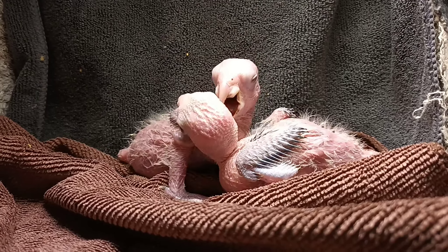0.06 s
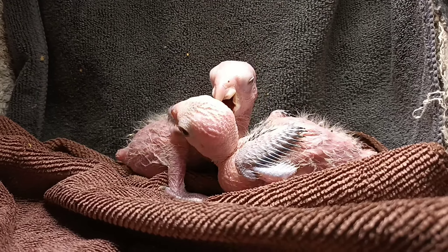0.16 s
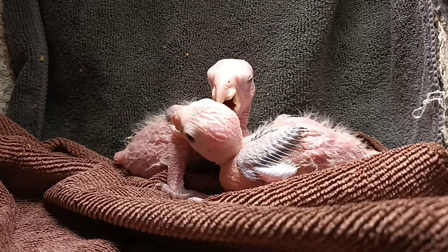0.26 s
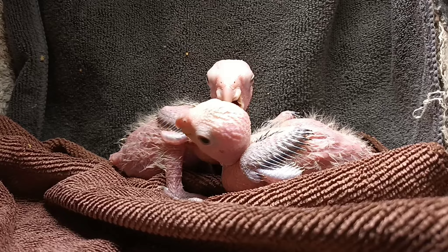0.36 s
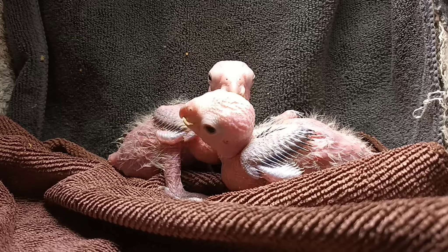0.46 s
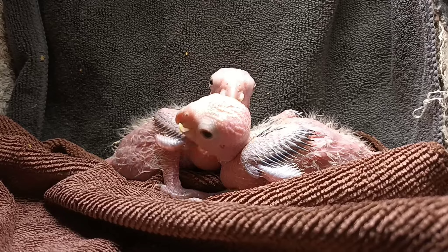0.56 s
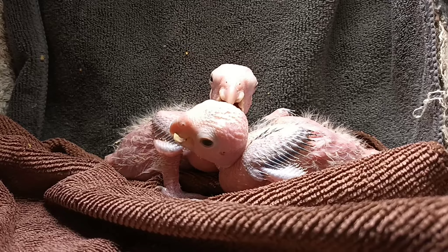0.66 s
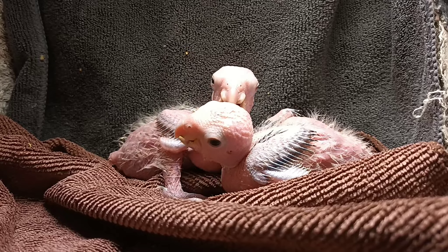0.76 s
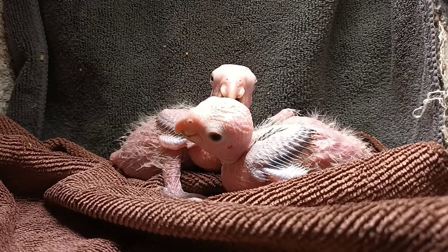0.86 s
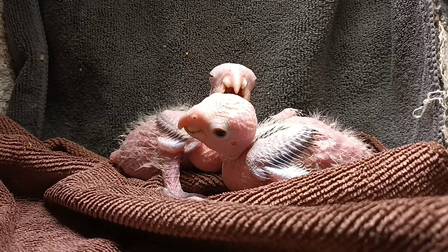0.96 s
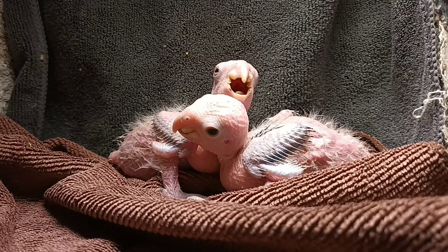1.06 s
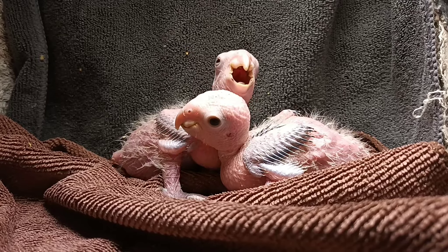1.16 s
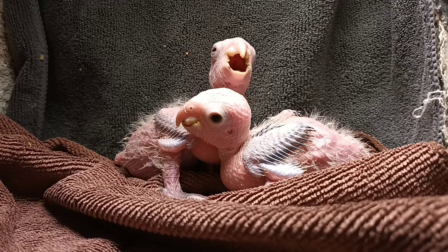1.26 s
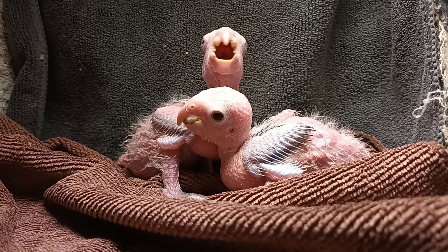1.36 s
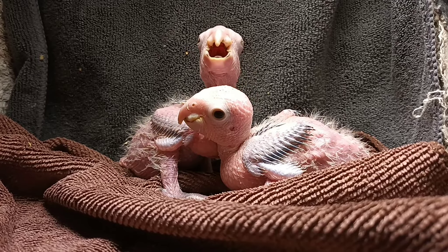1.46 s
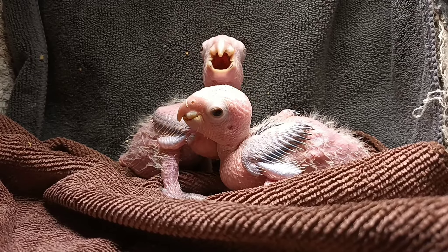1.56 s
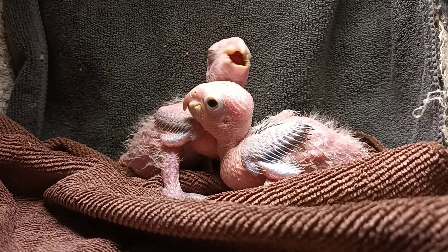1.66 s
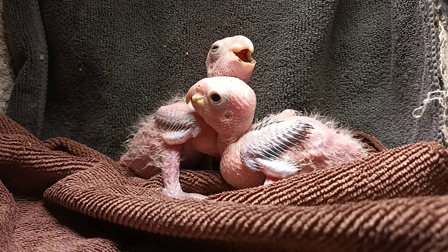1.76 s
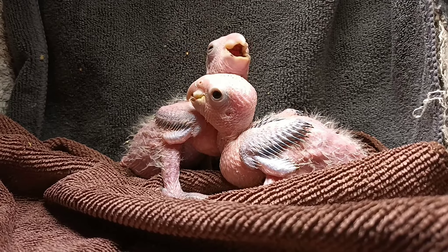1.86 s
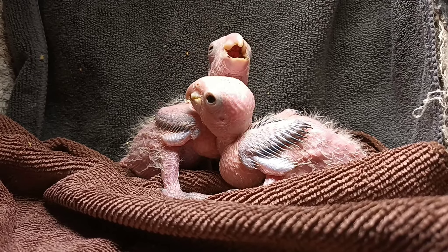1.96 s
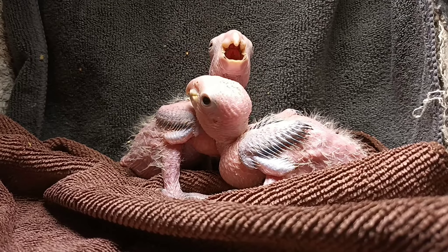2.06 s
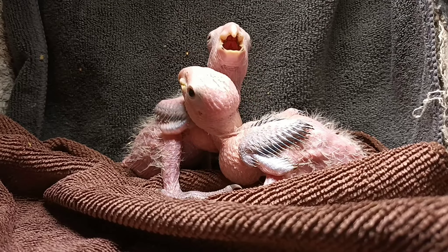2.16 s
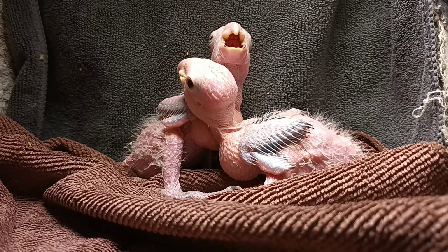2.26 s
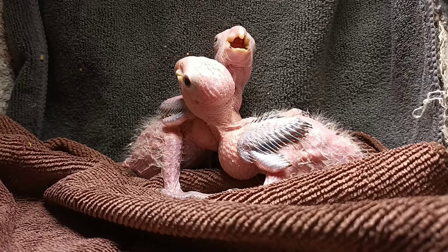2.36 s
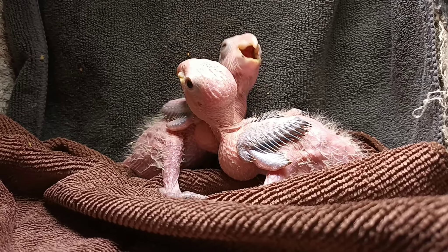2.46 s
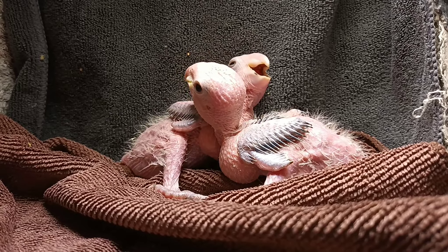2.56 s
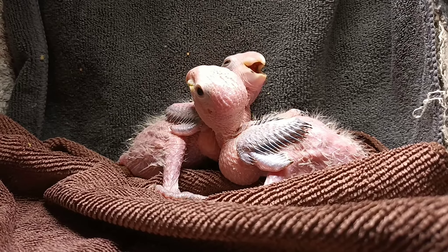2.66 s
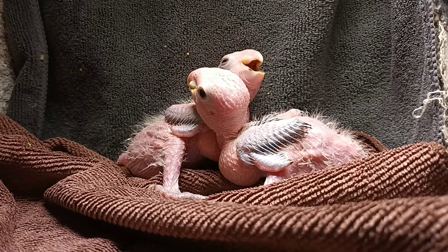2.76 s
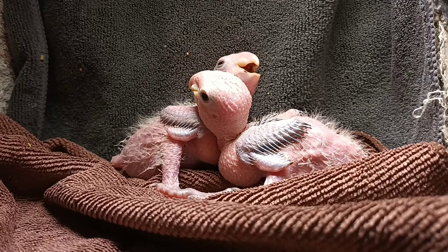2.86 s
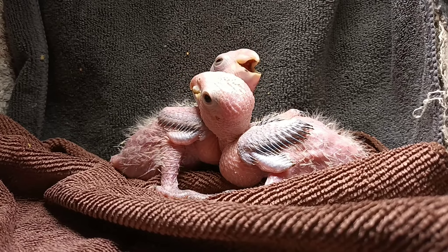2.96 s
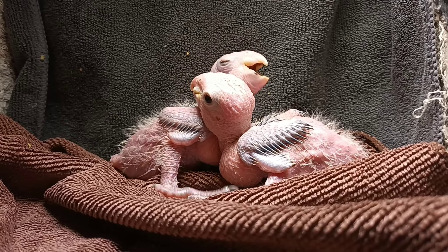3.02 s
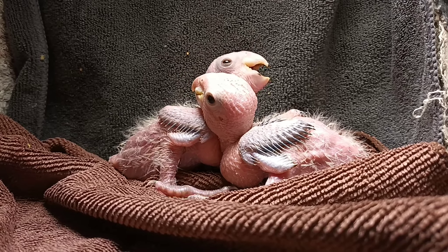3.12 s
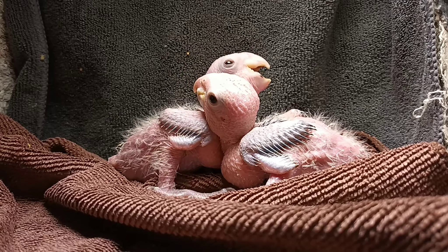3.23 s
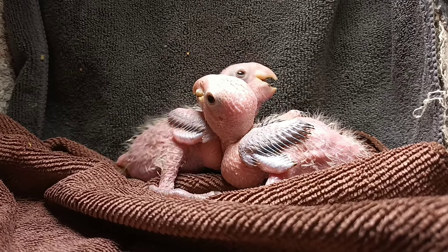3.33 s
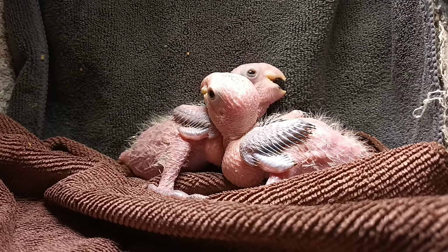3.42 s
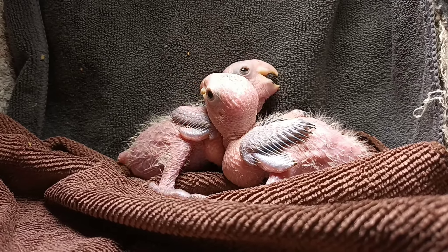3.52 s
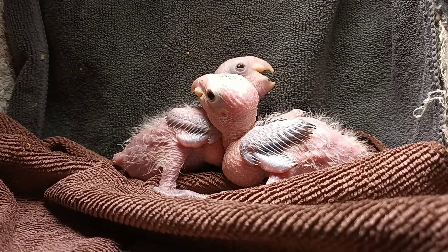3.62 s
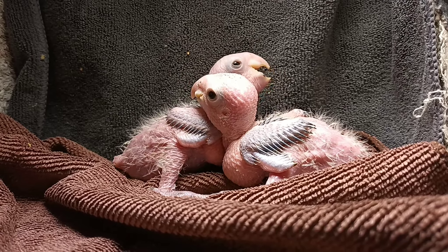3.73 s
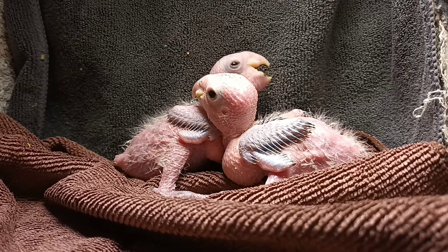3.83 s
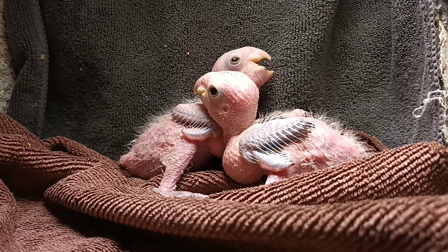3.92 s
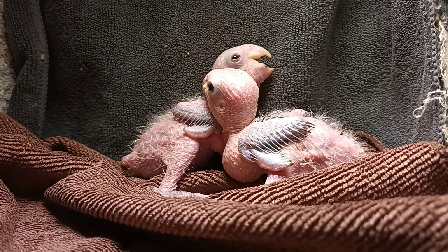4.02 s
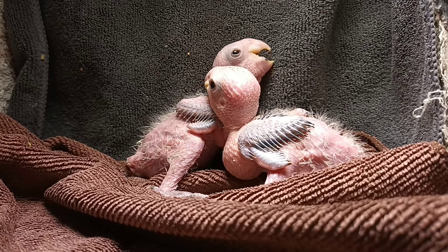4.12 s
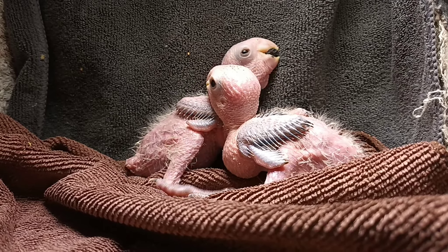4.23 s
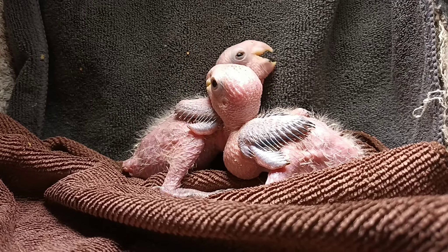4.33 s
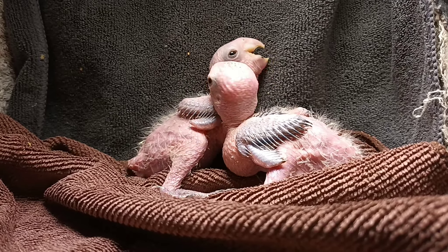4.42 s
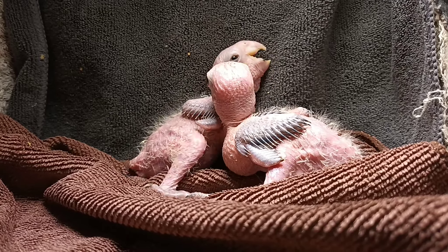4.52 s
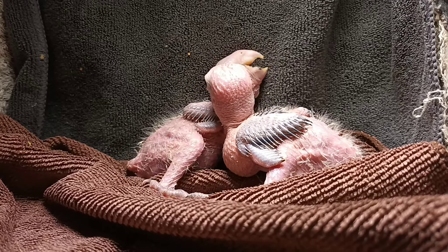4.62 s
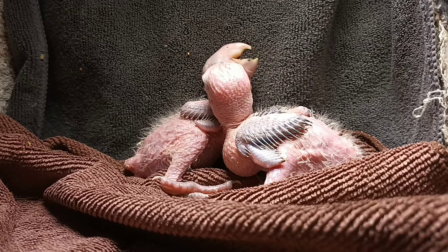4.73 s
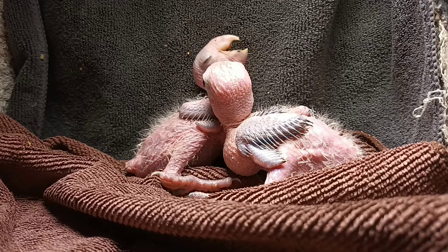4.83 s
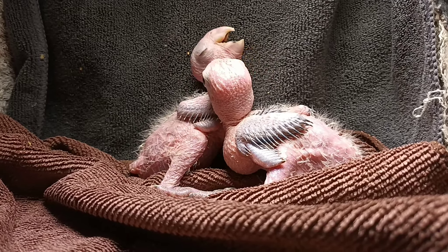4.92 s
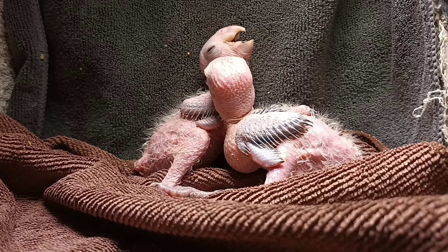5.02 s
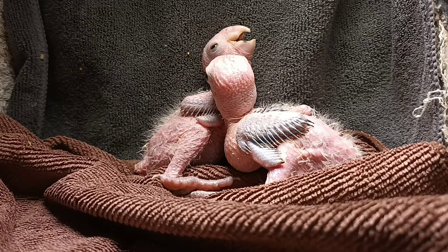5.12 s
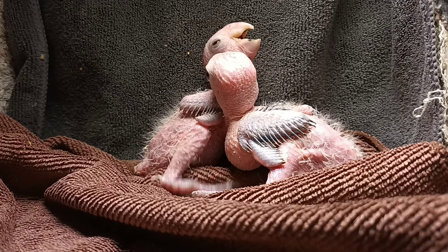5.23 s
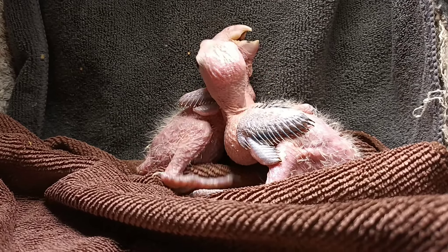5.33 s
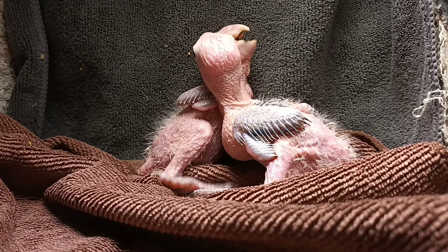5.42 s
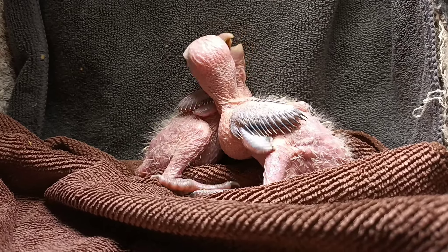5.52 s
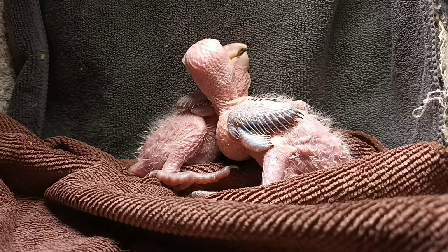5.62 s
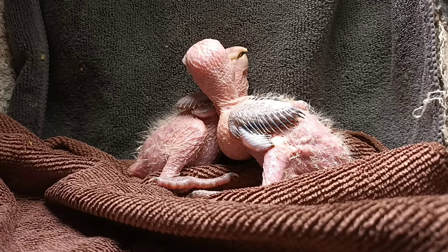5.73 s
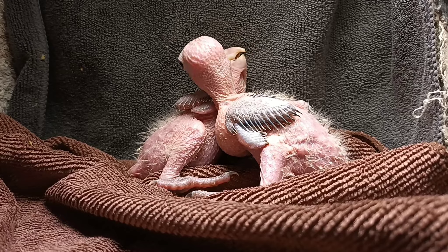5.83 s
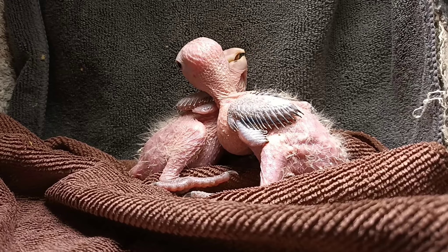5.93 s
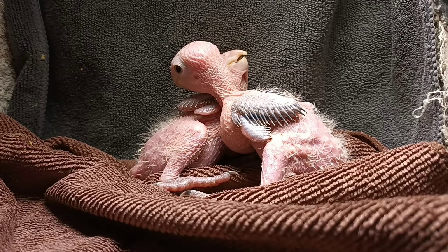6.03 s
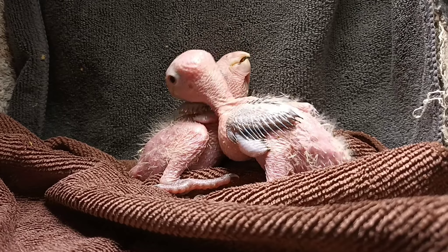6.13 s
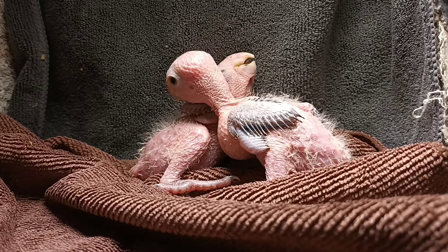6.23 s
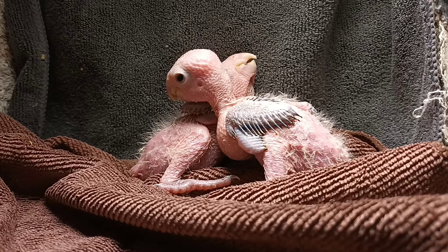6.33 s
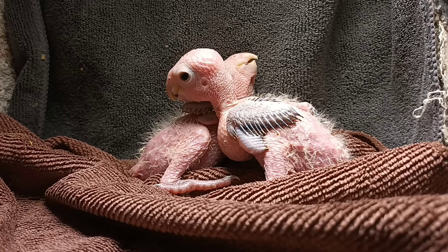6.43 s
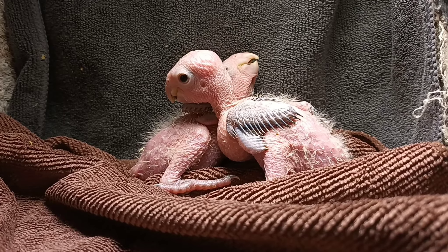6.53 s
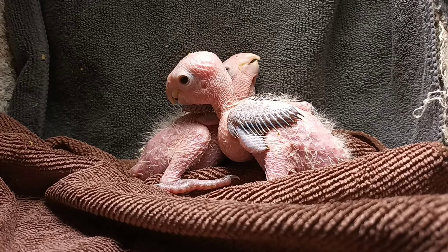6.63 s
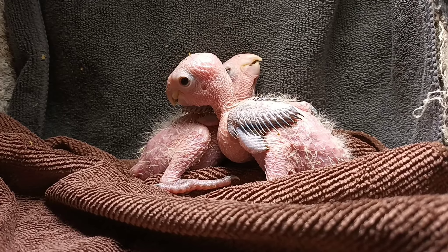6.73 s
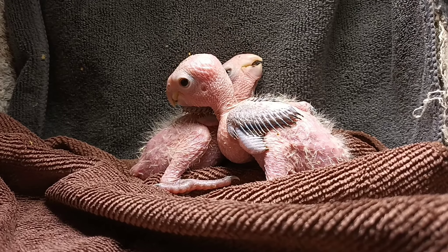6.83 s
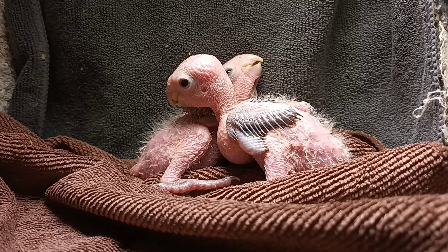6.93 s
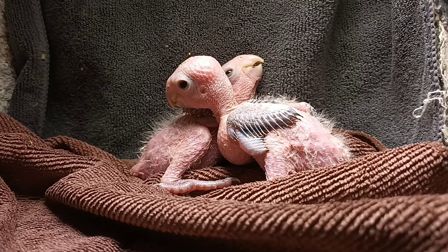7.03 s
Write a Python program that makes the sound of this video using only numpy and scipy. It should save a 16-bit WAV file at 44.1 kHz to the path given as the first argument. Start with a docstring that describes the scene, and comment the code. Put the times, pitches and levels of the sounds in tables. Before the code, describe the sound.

A close stereo microphone picks up a parrot chick begging in a towel-lined nest in a small, fairly dry room. From 0 s it repeats a tight pattern: a tenth-of-a-second nasal squeak, rising then dropping, followed at once by a harsh, fluttering rasp of about a third of a second. Pairs come roughly every 0.45 s. Between 0.3 and 0.6 s a nest mate cries over it, starting hoarse, turning clearer and falling away. The first calls are the brightest and loudest; later ones grow slightly lower and duller. Faint soft bumps occur near 3.2 and 4.1 s. The last rasp ends around 5.45 s, then a final weaker squeak at 5.5 s sinks into a tiny whimper by 5.7 s. Until about 7 s only sparse padded thuds on cloth remain, over low rumble and faint hiss that had been pushed down beneath the calls.

```python
"""Short arched squeaks alternate with long harsh rasps, a little over two pairs a second: a parrot chick
begs from a towel-lined nest. Taut membranes sing the squeaks, slack ones flap out puffs of noise; throat
and beak resonances colour both. A nest mate cries hoarsely once. The last squeak sinks into a whimper.
Padded thuds on the cloth, mostly after the begging, sit over low rumble and faint hiss of shaped noise.
The recorder's fast compressor pushes the background down under loud calls."""
import sys
import numpy as np
from scipy import signal
from scipy.fft import rfft, irfft
from scipy.io import wavfile
from scipy.ndimage import uniform_filter1d, map_coordinates

SR = 44100
rng = np.random.default_rng(int(sys.argv[2]) if len(sys.argv) > 2 else 0)


def materialize(psi):
    """Save the field psi as 16-bit PCM at rate SR to the path in sys.argv[1].

    A 1-D psi becomes a single channel; in a 2-D psi each row is a channel.
    """
    bounded = np.clip(np.atleast_2d(psi).T, -1, 1)
    quanta = np.round(bounded * 32767).astype(np.int16)
    wavfile.write(sys.argv[1], SR, quanta)


N = 312228
TIME_S = np.arange(N) / SR


def undb(db):
    """Decibels to gain."""
    return 10 ** (np.asarray(db) / 20)


def unit(x):
    """Scale to an rms of one."""
    return x / np.sqrt(np.mean(x ** 2))


def curve(rows, x):
    """Table columns, interpolated linearly over the first one at x."""
    knots, *columns = np.transpose(rows)
    return [np.interp(x, knots, column) for column in columns]


def times(start_s, end_s):
    """Sample times of one sound, in seconds."""
    return np.arange(int(start_s * SR), int(end_s * SR)) / SR


def wander(t, rate_hz):
    """Smooth random curve through normal draws, rate_hz knots a second, spread near one."""
    elapsed = t - t[0]
    knots = rng.standard_normal(int(elapsed[-1] * rate_hz) + 2)
    return map_coordinates(knots, [elapsed * rate_hz], order=2, mode="nearest")


def add(out, start_s, x):
    """Mix a stereo sound in at its time."""
    i = max(int(start_s * SR), 0)
    out[:, i:i + x.shape[1]] += x[:, :N - i]


def split(left_minus_right_db):
    """A level difference shared evenly by the two sides, in dB."""
    return np.array([[left_minus_right_db], [-left_minus_right_db]]) / 2


def nest(x, echo_db=-4.0, decay_s=0.0019):
    """Echoes off the nest walls; they change through a call as the head sways."""
    t = times(0, .02)
    echoes = unit(rng.standard_normal((2, 2, len(t))) * t * np.exp(-t / decay_s))
    walls = undb(echo_db) * echoes / np.sqrt(len(t))
    early, late = (signal.fftconvolve(x, wall, axes=1)[:, :x.shape[1]] for wall in walls)
    sway = np.linspace(0, np.pi / 2, x.shape[1])
    return x + early * np.cos(sway) + late * np.sin(sway)


# resonances of throat, beak and nest:
# (centre before tuning [Hz], -6 dB width [Hz], left level [dB], right level [dB])
RESONANCES = [(1425, 400, -18.5, -37), (2572, 620, -5, -15.5), (3770, 1360, -8, -12), (4420, 134, -3, 2.5),
              (4833, 236, 3.5, -56), (5360, 580, -4.5, -6), (6085, 263, 7.5, -3), (6425, 340, 1, -2.5),
              (7130, 680, -14, -30), (10020, 810, -33, -17.5), (11316, 440, -20.5, -4.5),
              (15500, 1130, -9.5, -10)]
# seat of the chick: (time [s], centre of the dip from the nest-floor bounce [Hz],
# left lag scale [0.1 = PORT_LAG as listed], squeak fundamental re throat output [dB])
SEAT = [(0, 3430, 0.1, -13), (.5, 3570, 0.1, -12), (1.4, 3360, 0.092, -16.5), (1.9, 3505, 0.083, -9.5),
        (2.6, 2640, 0.069, -8), (3.6, 2740, 0.059, -9), (4.3, 2920, 0.05, -13.5), (5.5, 3040, 0.043, -11)]
# nest-bent path to the two ports: (frequency [Hz], left phase lag at lag scale 0.1 [rad])
PORT_LAG = [(0, 7.5), (1150, -1.5), (2300, 4.5), (3300, 4), (4000, 4), (4750, 4), (5800, 5.5), (6500, 7.5),
            (8000, 10), (16000, 23)]


def throat(source, start_s, posture, beak_width_hz=500, notch_db=-13, notch_width_hz=85,
           lowest_hz=850, size=32768):
    """Ring a source through throat and beak; nest and port spacing set the two sides apart."""
    beak_hz, beak_db, tuning, tilt_db_per_oct, treble_db, pan_db = posture
    notch_hz, lag_scale, _ = curve(SEAT, start_s)
    f = np.fft.rfftfreq(size, 1 / SR)
    power = 0
    for hz, width_hz, left_db, right_db in RESONANCES:
        shape = 1 / (1 + (2 * (f - hz * tuning) / width_hz) ** 2) ** 2
        power = power + undb([[left_db], [right_db]]) ** 2 * shape
    db = beak_db / (1 + ((f - beak_hz) / beak_width_hz) ** 2)
    db = db + notch_db / (1 + ((f - notch_hz) / notch_width_hz) ** 2)
    db = db + tilt_db_per_oct * np.log2(np.clip(f, 2250, 7300) / 4500)
    db = db + treble_db * np.clip((f - 7000) / 4500, 0, 1.5)
    # so small a beak radiates little bass
    radiation = 1 / (1 + (lowest_hz / (f + 100)) ** 4)
    gain = np.sqrt(power * radiation) * undb(db + split(pan_db))
    # minimum phase: resonances ring after the push, never before
    cepstrum = irfft(np.log(gain).mean(0))
    ring_phase = 2 * rfft(cepstrum[:size // 2], size).imag
    phase = ring_phase - curve(PORT_LAG, f)[0] * np.array([[10 * lag_scale], [0]])
    y = irfft(rfft(source, size) * gain * np.exp(1j * phase))
    return unit(nest(y[:, :len(source) + SR // 50]))


# voice organ: (harmonic number [1], level [dB])
OVERTONES = [(2, 13), (3, -1), (4, 12), (5, 4), (6, 0.5), (7, -6), (10, -0.5), (18, -43.5)]


def overtones(phase, half=0, count=18):
    """Harmonics 2 to count - 1; alternating strong and weak cycles add lines between them."""
    number, db = np.transpose(OVERTONES)
    stack = sum(undb(np.interp(k, number, db)) * np.sin(k * phase) for k in range(2, count))
    return unit(stack) * (1 + half * np.cos(phase / 2))


# (start [s], end [s], throat output level [dB], top pitch [Hz], place of top [0-1],
# share of pitch lost by the end [0-1], then posture: beak resonance [Hz], beak boost [dB],
# throat tuning [factor], tilt [dB/octave], treble [dB], left-minus-right offset [dB])
SQUEAKS = [(0, 0.086, -3, 963, 0.46, 0.22, 3600, 7.5, 1.12, 4, -5, 1),
           (0.45, 0.546, -4, 940, 0.39, 0.22, 4050, -3, 1.02, 8, 10.5, 3),
           (0.909, 1.01, -8, 937, .38, 0.21, 4540, 15.5, 1.06, 2, 0, 1),
           (1.367, 1.476, -0.5, 941, .46, 0.22, 4700, 14.5, 0.985, 3.5, 4.5, 0.5),
           (1.819, 1.92, -13.5, 893, 0.37, .2, 3320, 11, 0.98, 7.5, -9, -1),
           (2.269, 2.376, -15, 888.5, .44, 0.15, 2940, 11, 0.96, 7, 2, 3),
           (2.735, 2.835, -13.5, 915.6, 0.32, 0.2, 3730, 9, 0.98, 5, 5.5, 3),
           (3.186, 3.292, -14, 893, 0.36, 0.19, 3200, 7, 0.94, 6, -6, 3.5),
           (3.637, 3.743, -15, 879.6, .32, .18, 3240, 11, 0.97, 6.5, -3.5, 3.5),
           (4.105, 4.215, -19.5, 875, .46, 0.23, 3100, 4, 0.975, 0, -7, -0.5),
           (4.546, 4.653, -12.5, 862, 0.35, 0.15, 3130, 10, 0.96, 3, -11, 2.5),
           (5.011, 5.118, -14.5, 868, 0.29, 0.15, 3110, 12, 0.95, 5.5, 1.5, 3.5),
           (5.483, 5.584, -20.5, 865, 0.49, 0.23, 3303, 5, 0.97, -1.5, -16, 1)]
# share below top pitch at the start; exponents of rise and fall
SQUEAK_RISE, RISE_POWER, FALL_POWER = .2, 2.2, 1.8
# flicker of pitch and force, as shares
SQUEAK_JITTER, SQUEAK_SHIMMER = .004, .05


def squeak(row, waver=0.0036, air_db=-31, beak_width_hz=380, overtone_power=1.005,
           fundamental_power=0.93, fundamental_pan_db=2.8):
    """Taut membranes sing an arch of pitch and force; the fundamental bypasses the resonances."""
    start_s, end_s, level_db, top_hz, crest, fall, *posture = row
    t = times(start_s, end_s)
    u = np.linspace(0, 1, len(t))
    rise_sag = SQUEAK_RISE * np.abs(1 - u / crest) ** RISE_POWER
    fall_sag = fall * np.abs((u - crest) / (1 - crest)) ** FALL_POWER
    sag = np.where(u < crest, rise_sag, fall_sag)
    flicker = 1 + SQUEAK_JITTER * wander(t, 427) + waver * wander(t, 68.0)
    phase = 2 * np.pi * np.cumsum(top_hz * (1 - sag) * flicker) / SR
    force = np.abs(np.sin(np.pi * u))
    source = overtones(phase) * (1 + SQUEAK_SHIMMER * wander(t, 270))
    source = source + undb(air_db) * rng.standard_normal(len(t))
    y = throat(source * force ** overtone_power, start_s, posture, beak_width_hz)
    fundamental = unit(force ** fundamental_power * np.sin(phase))
    fundamental_db = curve(SEAT, start_s)[-1]
    y[:, :len(t)] += undb(fundamental_db + split(fundamental_pan_db)) * fundamental
    return start_s, y * undb(level_db)


def noise(spectrum, likeness):
    """Stereo noise of a given colour, rms one; likeness 1 is the same on both sides."""
    hz, db = np.transpose(spectrum)
    f = np.fft.rfftfreq(N, 1 / SR)
    gain = undb(np.interp(np.log(f + 1), np.log(hz), db))
    mid, side = irfft(rfft(rng.standard_normal((2, N))) * gain, N)
    c = np.clip(likeness, 0, 1)
    return unit(np.sqrt(1 + c) * mid + np.sqrt(1 - c) * np.array([side, -side]))


# (frequency [Hz], relative spectral density [dB])
RUMBLE_SPECTRUM = [(15, -63), (25, -67), (64, -2.5), (141, 2), (206, -7), (266, -1.5), (327, -13.5),
                   (375, -7.5), (501, -16.5), (605, -9), (706, -26), (867, -14.5), (1500, -93), (1950, -84),
                   (3300, -120)]


def rumble(level_db=-48):
    """Low room noise, identical on both sides."""
    return noise(RUMBLE_SPECTRUM, likeness=1.0) * undb(level_db)


# (time [s], level [dB])
HISS_LEVEL = [(5.6, -50.5), (5.73, -57.5), (5.78, -49.5), (6.1, -50), (6.6, -51), (7.08, -54.5)]
# (frequency [Hz], relative spectral density [dB])
HISS_SPECTRUM = [(530, -7), (900, -9.5), (1490, -20.5), (2120, -21.5), (2760, -17.5), (3910, -13.5),
                 (5750, -9.5), (8660, -29), (9530, -25), (11800, -30), (13800, -37), (16000, -27)]


def hiss():
    """Faint broadband noise, nearly independent on the two sides."""
    return noise(HISS_SPECTRUM, likeness=0.035) * undb(curve(HISS_LEVEL, TIME_S)[0])


def room(x, t60_s=0.54, wet_db=-32, near_t60_s=0.2, near_db=-20.5,
         low_t60_s=0.55, low_db=-18, absorb_hz=900):
    """Quick echoes off furniture, then the room's ring; towels swallow treble, so lows linger."""
    t = times(0, .5)

    def tail(decay_s):
        return unit(rng.standard_normal((2, len(t))) * undb(-60 * t / decay_s) * (t > .003))

    near, far, low = tail(near_t60_s), tail(t60_s), tail(low_t60_s)
    # low_db scales the low tail as if before this filter
    low = signal.sosfilt(signal.butter(2, absorb_hz, fs=SR, output="sos"), low)
    response = undb(near_db) * near + undb(wet_db) * far + undb(low_db) * low
    return signal.fftconvolve(x, response / np.sqrt(len(t)), axes=1)[:, :N]


# (nominal start [s], nominal end [s], level [dB], fade [s], then posture: beak resonance [Hz],
# beak boost [dB], throat tuning [factor], tilt [dB/octave], treble [dB], left-minus-right offset [dB])
RASPS = [(0.088, 0.471, -2.5, 0.031, 5746, -26, 0.98, 13.5, -33, 2),
         (0.552, 0.877, 1, 0.11, 6130, -11.5, 1.011, 11.5, -28, 3),
         (1.023, 1.338, -4.5, 0.0083, 4370, 9.5, 0.97, 3.5, -12, 2),
         (1.481, 1.794, 0, 0.024, 4370, 12.5, 0.967, 3, -8.5, 1),
         (1.932, 2.242, -2, 0.017, 4030, 12, 0.98, 2.5, -8.5, 2.5),
         (2.385, 2.701, -5.5, 0.021, 4090, 11.5, 0.96, 1.5, -6, 0.5),
         (2.845, 3.158, -6, 0.029, 4040, 11, 0.96, 1.5, -9, 0.5),
         (3.298, 3.61, -9, 0.014, 4300, 9, 0.94, -2, -20, 0.5),
         (3.754, 4.092, -7.5, 0.023, 4010, 13, 0.962, -2.5, -17, 0.5),
         (4.22, 4.525, -8, 0.019, 3830, 13.5, 0.94, -2.5, -20, 1.5),
         (4.672, 4.984, -7, 0.015, 3830, 14, 0.96, -1.5, -7.5, 1.5),
         (5.133, 5.456, -6, 0.01, 3820, 17, 0.96, -1, -8, 2)]
RASP_ATTACK_S, RASP_FLAP_HZ = 0.047, 238


def rasp(row, jitter=0.31, flap_db=12, puff_s=0.0049, air=0.28, flutter_db=3.0, swell_db=3.5,
         edge_power=1.43, drift=0.015):
    """Slack membranes flap irregularly; each flap lets a puff of turbulent air into the throat."""
    start_s, end_s, level_db, fade_s, *posture = row
    t = times(start_s - .007, end_s + .006)
    cycles = np.cumsum(RASP_FLAP_HZ * np.exp(jitter * wander(t, RASP_FLAP_HZ))) / SR
    # puff sizes spread evenly from -3 to -1 times flap_db
    sizes = undb(flap_db * (2 * rng.random(int(cycles[-1]) + 1) - 3))
    puffs = sizes[cycles.astype(int)] * np.exp(-(cycles % 1) / RASP_FLAP_HZ / puff_s)
    attack = np.clip((t - t[0]) / RASP_ATTACK_S, 0, 1)
    fade = np.clip((t[-1] - t) / fade_s, 0, 1)
    force = (attack * fade) ** edge_power
    unsteady = undb(flutter_db * np.tanh(wander(t, 96.7)) + swell_db * wander(t, 8.3))
    source = (air + puffs) * unsteady * force * rng.standard_normal(len(t))
    # throat tightens and relaxes: blend of two tunings
    tight, loose = (throat(source, start_s, np.multiply(posture, [k, 1, k, 1, 1, 1]))
                    for k in (1 + drift, 1 - drift))
    tension = (1 + np.tanh(wander(np.arange(tight.shape[1]) / SR, 4.83))) / 2
    return t[0], unit(tension * tight + (1 - tension) * loose) * undb(level_db)


# (time [s], pitch [Hz], level [dB], roughness [0-1], relative half-harmonic strength [0-1])
CRY = [(.32, 912, -10, 0.74, 0.1), (.35, 1005, -4, 0.75, 0.8), (.42, 1043, -1.5, 0.56, 1),
       (.45, 980, -4, 0.31, 0.64), (.49, 1005, 2.5, 0.15, 0.6), (.53, 1052, -3.5, 0.06, 0),
       (.57, 992, -5.5, 0.13, 0.2), (.6, 885, -8, 0.3, 0), (.625, 770, -21, 0.3, 0)]
# one row: (beak resonance [Hz], beak boost [dB], throat tuning [factor], tilt [dB/octave],
# treble [dB], left-minus-right offset [dB])
CRY_POSTURE = (5540, 16, 1.0, 1, -5, 3)


def cry(jitter=0.0668, air_db=1, half_gain=0.71, fundamental_db=-24):
    """The nest mate starts hoarse, passes through period doubling and ends on a falling note."""
    t = times(CRY[0][0], CRY[-1][0])
    hz, level_db, rough, half = curve(CRY, t)
    phase = 2 * np.pi * np.cumsum(hz * (1 + jitter * rough * wander(t, 600))) / SR
    voice = overtones(phase, half_gain * half) + (1 - rough) * np.sin(2 * phase)
    breath = undb(air_db) * rough * rng.standard_normal(len(t))
    source = (1 - rough) * voice + breath
    y = throat(source, t[0], CRY_POSTURE, beak_width_hz=65)[:, :len(t)]
    y = y + undb(fundamental_db) * np.sin(phase)
    return t[0], y * undb(level_db)


# feet and bodies on the cloth: (time [s], level [dB], mean pitch [Hz])
BUMPS = [(3.249, -30, 140), (4.106, -41, 83), (4.189, -37.5, 125), (5.61, -37.5, 201), (5.684, -36.5, 80.5),
         (6.018, -35.5, 115), (6.232, -40.5, 124), (6.622, -36.5, 100), (6.819, -43, 132),
         (7.052, -37.5, 77)]


def bump(row, rise_s=0.017):
    """A padded knock: a few low, uneven cycles that swell softly."""
    start_s, level_db, hz = row
    t = times(0, .15)
    swell = (t / rise_s * np.exp(1 - t / rise_s)) ** 2
    phase = 2 * np.pi * np.cumsum(hz * (1 + 0.21 * wander(t, 98))) / SR
    thud = np.sin(phase) * swell
    return start_s, undb(level_db) * np.array([thud, thud])


# (time [s], pitch [Hz], level [dB])
WHIMPER = [(5.57, 766, -55), (5.59, 652, -36), (5.615, 576, -42.5), (5.66, 510, -51), (5.71, 480, -53)]


def whimper(jitter=0.058, octave_db=-8):
    """Pressure runs out: the note sags unsteadily and keeps only its octave, which dies first."""
    t = times(WHIMPER[0][0], WHIMPER[-1][0])
    hz, level_db = curve(WHIMPER, t)
    phase = 2 * np.pi * np.cumsum(hz * (1 + jitter * wander(t, 222))) / SR
    octave = undb(octave_db + level_db - level_db.max()) * np.sin(2 * phase)
    y = (np.sin(phase) + octave) * undb(level_db)
    return t[0], np.array([y, y])


def scene():
    """Calls and thuds, the room's answer and the background noise."""
    nest_sounds = np.zeros((2, N))
    calls = [*map(squeak, SQUEAKS), *map(rasp, RASPS), cry(), whimper()]
    for start_s, sound in [*calls, *map(bump, BUMPS)]:
        add(nest_sounds, start_s, sound)
    return nest_sounds + room(nest_sounds) + rumble() + hiss()


THRESHOLD_DB, RATIO, RECOVERY_DB_PER_S, DETECTOR_S = -20.5, 6.5, 348, .012


def compress(x):
    """Turn loud sound down at once, recover quickly: calls even out, rumble ducks under them."""
    power = uniform_filter1d(np.mean(x ** 2, axis=0), max(int(DETECTOR_S * SR), 1))
    over_db = 10 * np.log10(np.maximum(power / undb(THRESHOLD_DB) ** 2, 1))
    cut_db = (1 - 1 / RATIO) * over_db
    # running maximum: the cut falls no faster than the recovery slope
    recovery_db = RECOVERY_DB_PER_S * TIME_S
    return x * undb(recovery_db - np.maximum.accumulate(cut_db + recovery_db))


def record(dry, ceiling=1.5, top_hz=15800):
    """The recorder compresses, rounds the highest peaks and cuts the top."""
    rounded = ceiling * np.tanh(compress(dry) / ceiling)
    lowpass = signal.ellip(8, .2, 70, top_hz, fs=SR, output="sos")
    return signal.sosfilt(lowpass, rounded)


dry = scene()
out = record(dry)
materialize(out)
```